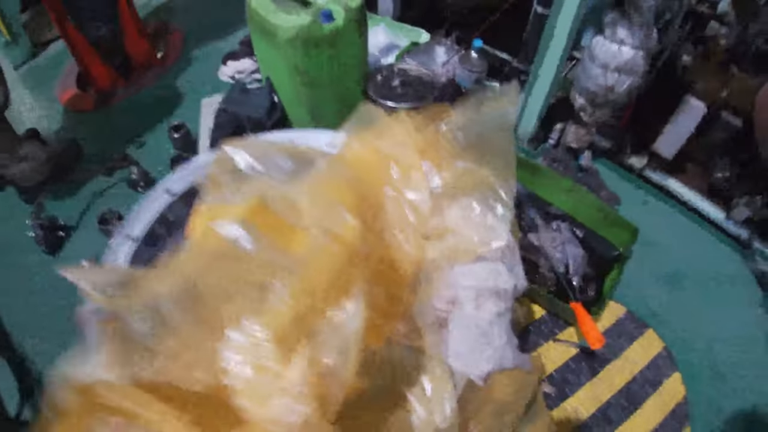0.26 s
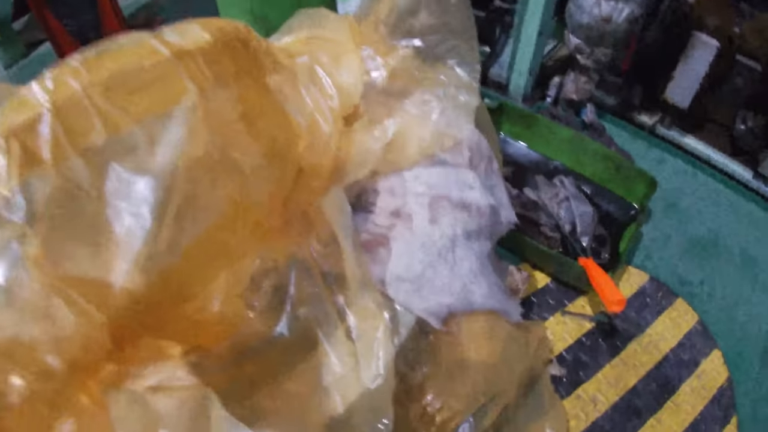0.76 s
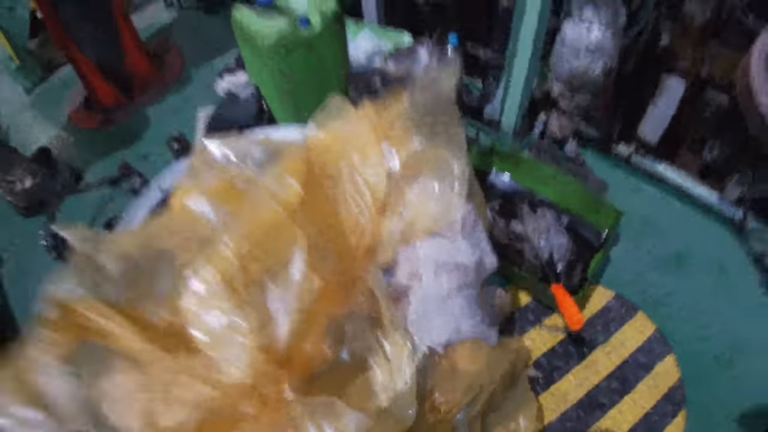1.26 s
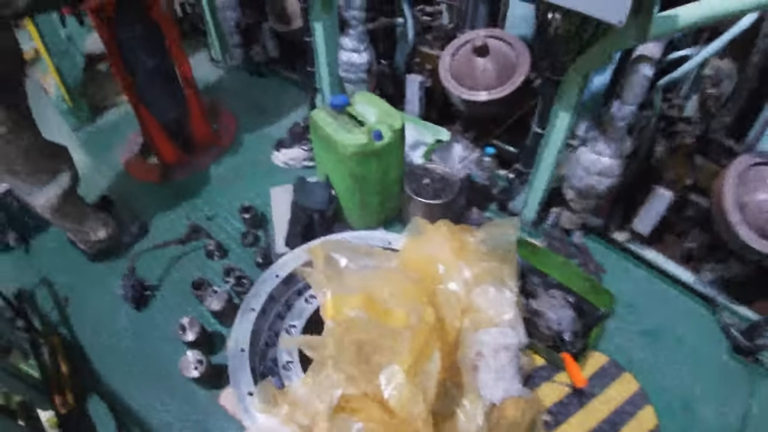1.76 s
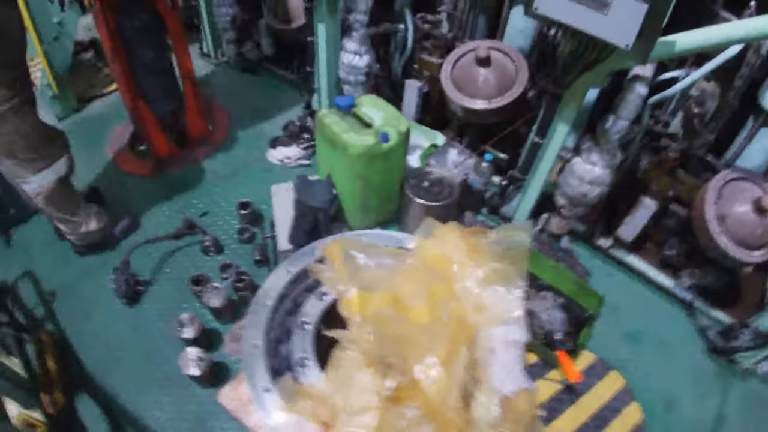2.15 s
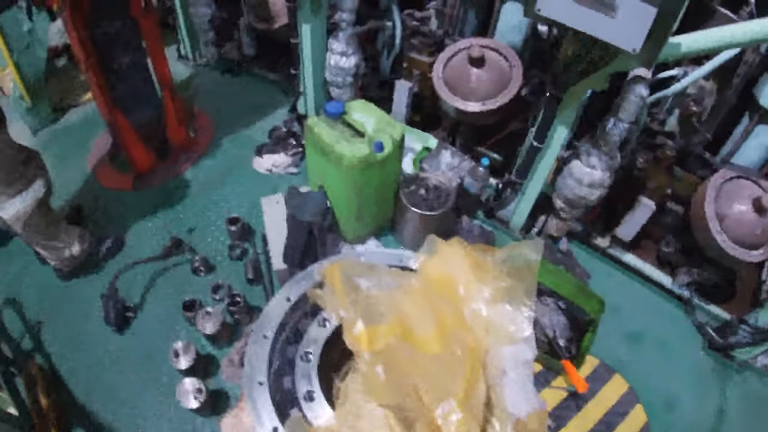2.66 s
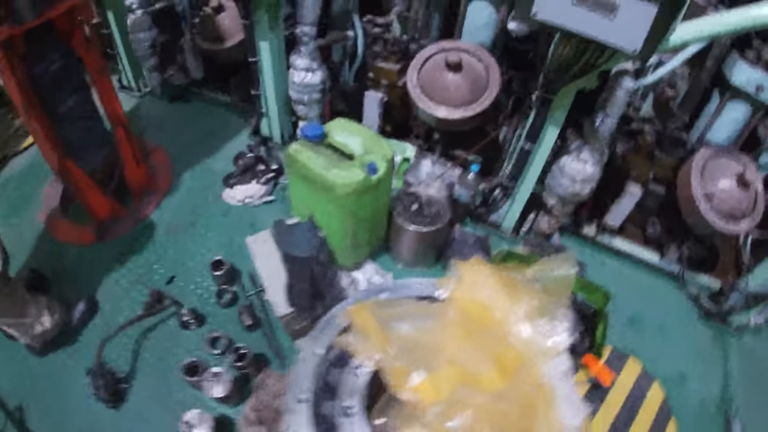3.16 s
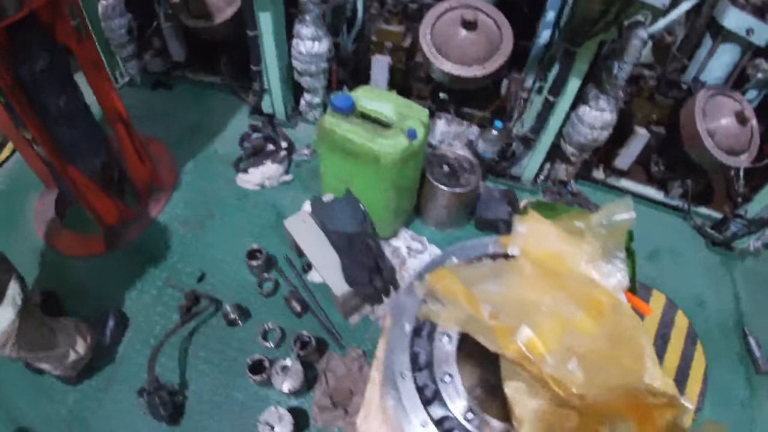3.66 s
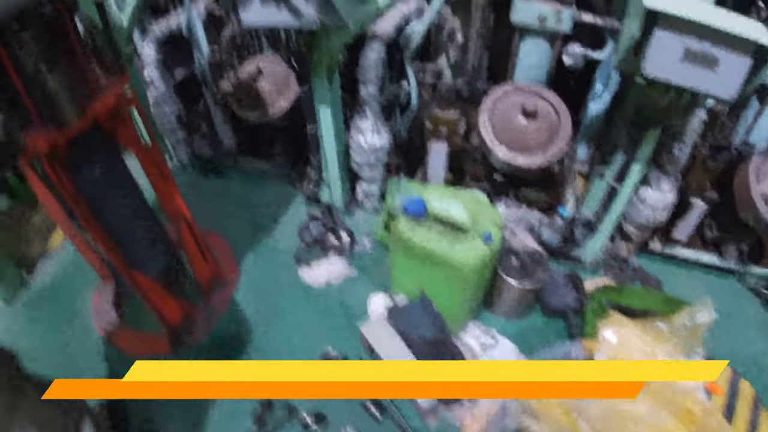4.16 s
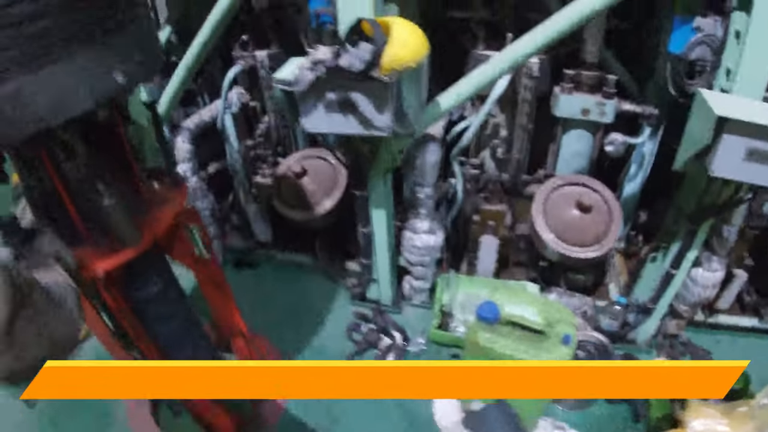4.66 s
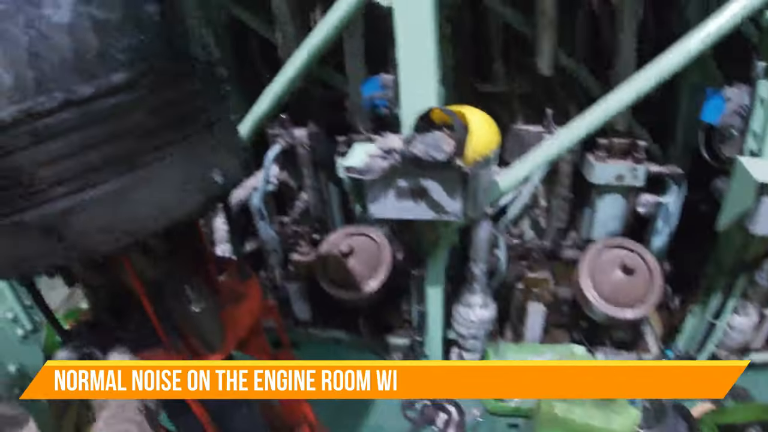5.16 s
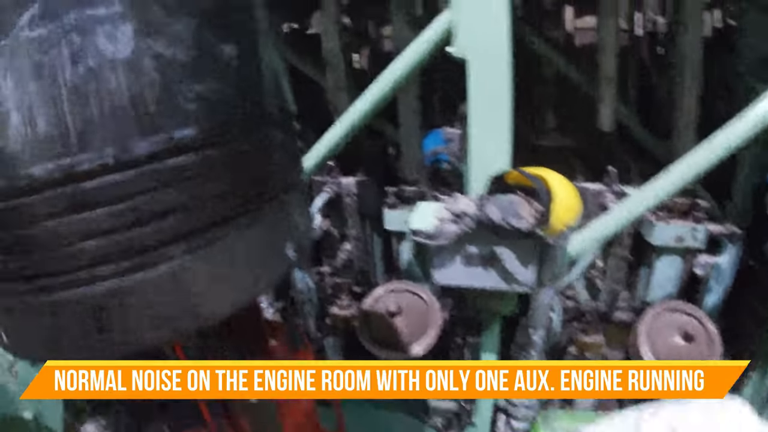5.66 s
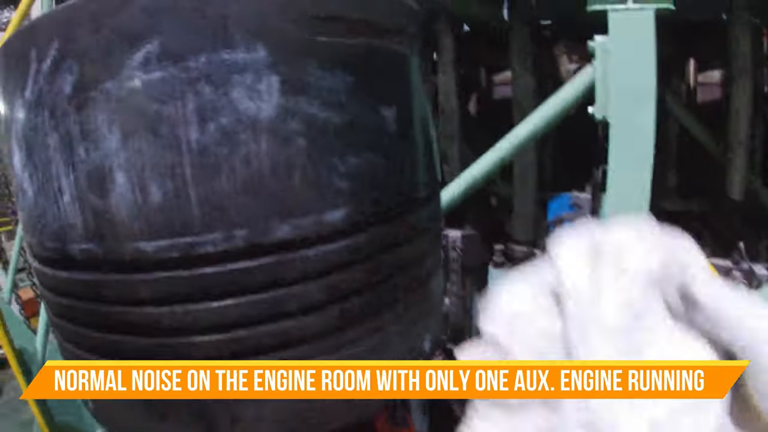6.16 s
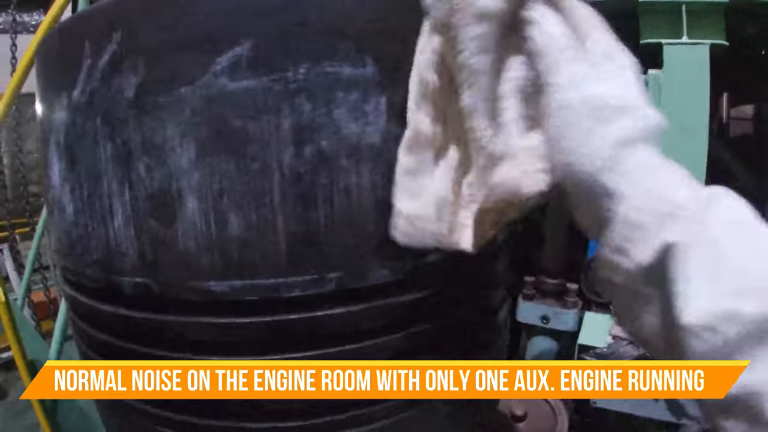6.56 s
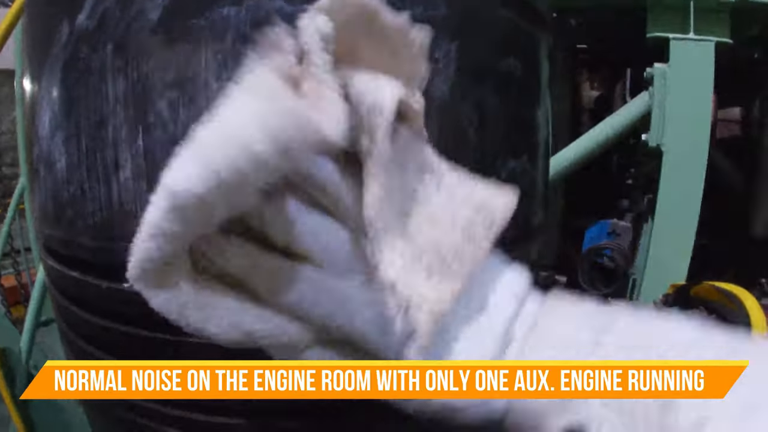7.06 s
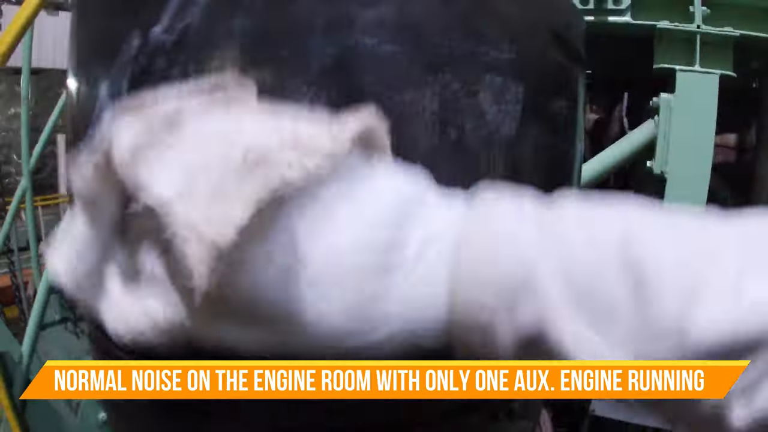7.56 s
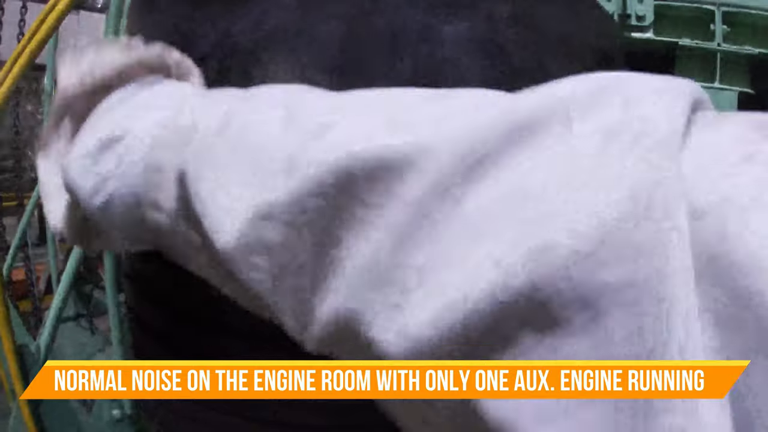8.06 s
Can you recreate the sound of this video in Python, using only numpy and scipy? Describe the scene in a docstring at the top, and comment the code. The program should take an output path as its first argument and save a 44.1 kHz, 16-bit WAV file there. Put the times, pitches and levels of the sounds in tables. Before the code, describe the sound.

A diesel generator runs at constant speed in a ship's steel engine room, giving a dense, low drone with a slight fast clatter. Ventilation roars behind it, a pump holds a few steady mid-pitched tones, and two thin high whines slowly draw together in pitch. Single tones swell and fade as the microphone is carried through the room. Near the end the clatter dulls slightly, while the drone carries on.

```python
"""Ship's engine room: a six-cylinder four-stroke diesel generator runs steadily at about 900 rpm.
Its orders drone in the steel room, swelling and fading as the microphone is carried through
standing waves. Ventilation roars behind it, a pump sings over steady hums, and the thin whines of
two fast rotors drift towards each other. Late on, a steel part screens the clatter and the
highest hiss fades briefly."""
import sys
import numpy as np
from scipy import signal
from scipy.fft import rfft, irfft
from scipy.io import wavfile
from scipy.ndimage import uniform_filter1d, minimum_filter1d, map_coordinates

SR = 44100
rng = np.random.default_rng(int(sys.argv[2]) if len(sys.argv) > 2 else 0)


def int16_out(signal):
    """Quantize to a 16-bit WAV file."""
    q = np.round(np.clip(np.atleast_2d(signal).T, -1, 1) * 32767)
    wavfile.write(sys.argv[1], SR, q.astype(np.int16))


N = 366912
TIME = np.arange(N) / SR
CYCLE_HZ = 7.479  # one cycle = two revolutions; orders are its multiples


def diesel(count=800, cycle_samples=8192, drone_diffuse=0.01):
    """The four-stroke cycle repeats; the room slowly reweights each order."""
    # leading orders: order, level at first spot/dB, level at second spot/dB
    drone = [(6, -34.5, -43.5), (9, -39, -33), (14, -38.5, -43), (21, -38.5, -41.5), (23, -37, -39.5),
             (24, -41, -40.5), (25, -37, -34), (26, -40, -35.5), (27, -41, -34.5), (28, -36.5, -42),
             (31, -35.5, -45), (32, -32.5, -36), (33, -49, -41.5), (34, -30.5, -34.5), (36, -49.5, -34.5),
             (39, -42, -39), (42, -40.5, -43.5), (48, -46, -43.5), (136, -51, -57.5)]
    # other prominent orders: order, level/dB
    prominent = [(8, -45), (10, -40), (12, -39.5), (13, -46.5), (16, -48), (17, -42.5), (18, -42),
                 (19, -42.5), (20, -46.5), (22, -47), (29, -46.5), (30, -52), (37, -43.5), (44, -44),
                 (46, -56), (47, -46.5), (50, -48.5), (51, -46.5), (54, -45.5), (65, -57.5), (67, -55),
                 (68, -46.5), (72, -50), (102, -55.5), (124, -59), (132, -56.5)]
    # all remaining orders: f/Hz, level of each/dB
    comb = [(8, -74), (40, -62.5), (80, -42.5), (150, -47), (220, -49), (300, -49), (400, -53),
            (520, -50.5), (620, -60), (760, -59), (1100, -60.5), (1400, -66), (1700, -70), (3000, -87),
            (6000, -99)]
    t = np.linspace(0, N / SR, num=200)
    hz = np.arange(count) * CYCLE_HZ
    level_db = spectrum(comb, hz)[:, None] + np.zeros(len(t))
    diffuse = spectrum([(45, 0.062), (200, 0.54), (600, 0.49), (2000, 0.81)], hz)  # f/Hz, power share
    for order, db in prominent:
        level_db[round(order)] = db
    for order, first_db, second_db in drone:
        level_db[round(order)] = walk_db(first_db, second_db, t) + standing_db("diesel", order, t)
        diffuse[round(order)] = drone_diffuse
    orders = from_db(level_db) * fading(hz, t, diffuse, walk_m_s=0.3)
    cycles = irfft(evenly_fired(orders).T, cycle_samples) * cycle_samples / np.sqrt(2)
    crank = TIME * CYCLE_HZ % 1
    return map_coordinates(cycles, [TIME / t[1], crank * cycle_samples], order=1, mode="grid-wrap")


def evenly_fired(orders, cycle_samples=256, count=42):
    """Cylinders share the load: low orders are phased so that no single thump dominates."""
    low = orders[:count]
    cycle = np.fft.ifft(low, cycle_samples, axis=0)
    flat = np.fft.fft(cycle / (abs(cycle) + 1e-12), axis=0)[:count]
    return np.vstack([abs(low) * np.exp(1j * np.angle(flat)), orders[count:]])


def clatter(depth_db=0.55, count=40):
    """Valves and injectors roughen the noise with the same gain pattern every cycle."""
    crank = np.linspace(0, 1, num=1024)
    pattern = sum(np.cos(2 * np.pi * (k * crank + rng.random())) / k ** 0.23 for k in range(2, count))
    return from_db(depth_db * np.interp(TIME * CYCLE_HZ % 1, crank, unit(pattern)))


def roar():
    """Ventilation and combustion noise rings the steel panels."""
    # noise spectrum: f/Hz, density/(dB per Hz)
    density = [(10, -69), (25, -54), (50, -55), (65, -53.5), (85, -53), (105, -52), (130, -50),
               (175, -50.5), (195, -56.5), (220, -55), (240, -49), (260, -55), (400, -60.5), (520, -64),
               (650, -65.5), (850, -71), (1100, -70), (1700, -79), (2750, -79.5), (4300, -89), (5600, -90),
               (6300, -101), (7200, -116)]
    # panel resonances: f/Hz, width/Hz, boost/dB
    panels = [(1423, 64, 5), (1753, 90, 5.5), (2430, 63, 3)]
    return turbulence(density, panels)


def pump(base_hz=350.95):
    """Harmonics of a steady pump; the three strongest pass through nodes and antinodes."""
    # strong tones: multiple, level at first spot/dB, level at second spot/dB, diffuse share/0-1
    strong = [(2, -50.5, -53.5, 0.28), (3, -52.5, -53, .3), (4, -53.5, -60, 0.05)]
    # weak tones: multiple, level/dB
    weak = [(6, -68.5), (7, -68.5), (8, -64), (9, -72), (10, -68), (11, -68), (12, -87), (14, -79.5)]
    song = np.zeros(N)
    for k, first_db, second_db, diffuse in strong:
        level_db = walk_db(first_db, second_db, TIME) + standing_db("pump", k, TIME)
        song += from_db(level_db) * tone(round(k) * base_hz, diffuse, walk_m_s=0.6)
    for k, db in weak:
        song += from_db(db) * tone(round(k) * base_hz, diffuse=0.68, walk_m_s=0.65)
    return song


def steady_tones():
    """Steady low hums, and two faint high tones beside the pump's seventh harmonic."""
    # tones: f/Hz, level/dB
    tones = [(82.5, -52), (108.5, -54.5), (169, -50.5), (238, -45), (2421, -65), (2491, -69)]
    return sum(from_db(db) * tone(hz, diffuse=0.76, walk_m_s=0.96) for hz, db in tones)


def rotors():
    """Two fast rotors converge in speed."""
    # blade tones: t/s, rising f/Hz, falling f/Hz
    pitches = [(0, 4613, 4753), (2, 4612, 4757), (2.7, 4620, 4752), (4, 4642, 4735), (5, 4652, 4721),
               (7.3, 4669, 4704), (8.32, 4680, 4682)]
    times_s, rising_hz, falling_hz = np.transpose(pitches)
    rising = whine("rising", np.interp(TIME, times_s, rising_hz))
    falling = whine("falling", np.interp(TIME, times_s, falling_hz))
    return rising + falling


def whine(name, hz, jitter_hz=2.2, third_db=-98):
    """Blade tone, octave and third harmonic: the speed trembles, all flutter in the room."""
    # per rotor: tone at first spot/dB, at second/dB, octave at first spot/dB, at second/dB
    levels = {"rising": (-69.5, -62.5, -74.5, -75.5), "falling": (-70.5, -70, -75.5, -73.5)}
    tone_db = walk_db(*levels[name][:2], TIME) + standing_db(name, 1, TIME)
    octave_db = walk_db(*levels[name][2:], TIME) + standing_db(name, 2, TIME)
    t = np.linspace(0, N / SR, num=1200)
    tremble = unit(drift(rate_hz=12, t=t)[0].real)
    hz = hz + jitter_hz * np.interp(TIME, t, tremble)
    return (from_db(tone_db) * tone(hz, diffuse=0.39, walk_m_s=1.0)
            + from_db(octave_db) * tone(2 * hz, diffuse=0.8, walk_m_s=0.45)
            + from_db(third_db) * tone(3 * hz, diffuse=0.85, walk_m_s=0.45))


def hiss():
    """Faint high noise of moving air."""
    # hiss spectrum: f/Hz, density/(dB per Hz)
    density = [(4000, -112), (7000, -108), (8000, -108), (9300, -105), (10000, -111), (10800, -120),
               (12200, -115), (14300, -119), (15300, -127)]
    return turbulence(density)


def turbulence(density, panels=()):
    """Noise of a given spectral density, lifted where panels ring."""
    hz = np.fft.rfftfreq(N, 1 / SR)
    ring_db = sum(db / (1 + (2 * (hz - mode_hz) / width_hz) ** 2) for mode_hz, width_hz, db in panels)
    rolloff = 1 / (1 + (hz / (1.15 * density[-1][0])) ** 20)
    gain = from_db(spectrum(density, hz) + ring_db) * rolloff
    return irfft(rfft(rng.standard_normal(N)) * gain, N) * np.sqrt(SR / 2)


def carried(x, boom_octaves=0.23, open_db=0.5, screen_db=-2.5, screen_start_s=6.38, screen_fade_s=0.82):
    """Bands swell where the room booms; near the second spot a big steel part screens the clatter."""
    # room lifts (+) and hollows (-) on the way: t/s, half length/s, f/Hz, gain/dB
    booms = [(0.148, .3, 376, 5.5), (.3, 1.2, 905, -1.5), (0.204, 1.1, 2880, -1.5), (.62, 0.16, 1120, 3.5),
             (1.15, 0.2, 495, 4.5), (1.3, .45, 165, 2), (1.753, 0.48, 396, 4), (2.702, 0.99, 173.5, -1),
             (2.607, 0.94, 608, 5), (3.699, 1.3, 1390, -1.5), (4.097, 0.58, 398, 4.5), (4.85, 0.3, 755, 3),
             (5.298, 1.3, 2960, 2), (5.544, 0.28, 510, 4.5), (5.7, .4, 295, -4.5), (5.805, 0.92, 373, 5.5),
             (6.303, 0.75, 125, 5), (6.6, 0.53, 191, 2), (6.696, 0.44, 760, 3), (6.897, 0.8, 623, -4),
             (7.304, 1.1, 293, 4), (8.05, 0.32, 545, 2.5), (8.1, 0.74, 1460, 2)]
    hz, t, bins = signal.stft(x, SR, nperseg=2048)
    boom_db = -1.5 * band(hz, centre_hz=426, octaves=2 * boom_octaves)  # constant hollow under the booms
    for at_s, half_s, centre_hz, db in booms:
        boom_db = boom_db + db * bell(t, at_s, half_s) * band(hz, centre_hz, boom_octaves)
    screened = np.clip((t - screen_start_s) / screen_fade_s, 0, 1)
    clatter_db = (open_db + screen_db * screened) * band(hz, centre_hz=2200, octaves=1)
    return signal.istft(bins * from_db(boom_db + clatter_db), SR, nperseg=2048)[1][:N]


def top_treble_dip(x, at_s=7.95, half_s=0.75, depth_db=-4.5):
    """The highest hiss fades briefly near the end."""
    hz, t, bins = signal.stft(x, SR, nperseg=512)
    dip_db = depth_db * bell(t, at_s, half_s) * band(hz, centre_hz=13000, octaves=0.45)
    return signal.istft(bins * from_db(dip_db), SR, nperseg=512)[1][:N]


def walk_db(first_db, second_db, t, start_s=2.33, end_s=8.4):
    """Level glide as the microphone moves from the first spot to the second."""
    return np.interp(t, [start_s, end_s], [first_db, second_db])


def standing_db(source, multiple, t):
    """Gain of one tone along the path through its standing waves."""
    # antinodes (+) and nodes (-): t/s, source, multiple, half length/s, gain/dB
    waves = [(0, "diesel", 24, .8, 5.5), (3.5, "diesel", 6, 1.2, 1.5), (5, "diesel", 9, 1, 1),
             (.8, "diesel", 23, .9, 4.5), (1, "diesel", 25, .3, -12), (1, "diesel", 26, .6, -9.5),
             (0.997, "diesel", 28, .5, -8), (3.05, "diesel", 36, .6, 12), (2.299, "diesel", 31, .8, 1),
             (3.15, "diesel", 32, 0.16, -7), (3.45, "diesel", 34, 0.37, -6), (4.4, "diesel", 32, 0.56, 1.5),
             (5.198, "diesel", 25, .68, 5), (5.298, "diesel", 39, .55, -12), (5.6, "diesel", 48, .8, 4),
             (5.899, "diesel", 34, 1, -10.5), (5.8, "diesel", 32, .45, -8.5), (6.9, "diesel", 32, .3, -8.5),
             (6.7, "diesel", 25, .38, -1), (7.603, "diesel", 26, .3, 4.5), (8.25, "diesel", 26, .27, -17),
             (0.676, "diesel", 136, .18, 6), (2.417, "diesel", 136, .3, 8.5), (3.25, "diesel", 136, .15, 6),
             (3.85, "diesel", 136, .15, 5.5), (7.698, "diesel", 136, .4, -9.5),
             (2.15, "pump", 2, 0.62, 11.5), (3.218, "pump", 2, .18, 12.5), (3.703, "pump", 2, .2, -3),
             (4.3, "pump", 2, .15, 5), (4.98, "pump", 2, .15, 5.5), (2, "pump", 3, .15, 10),
             (6.1, "pump", 3, .35, 5), (7.1, "pump", 3, .35, 5), (.75, "pump", 4, .15, 5),
             (1.12, "pump", 4, .09, 8.5), (1.432, "pump", 4, .08, 7.5), (1.85, "pump", 4, .1, -10),
             (2.352, "pump", 4, .28, 6.5), (2.97, "pump", 4, .13, -13), (4.72, "pump", 4, .17, 5),
             (7.9, "pump", 4, .6, 9), (1.2, "rising", 1, .33, -6), (1.65, "rising", 1, .12, 7.5),
             (4.3, "rising", 1, .6, 4), (5.3, "rising", 1, .2, 3), (5.85, "rising", 1, .22, 5.5),
             (6.8, "rising", 1, 0.19, -5), (7.6, "rising", 1, .2, 1.5), (7.92, "rising", 1, .07, -13),
             (6.12, "falling", 1, .14, 7), (7.5, "falling", 1, .15, -3), (7.9, "falling", 1, .08, -7),
             (2.28, "rising", 2, .05, 8), (2.46, "rising", 2, .16, -14), (2.78, "rising", 2, .09, 6),
             (4.45, "rising", 2, .06, 4), (6.4, "rising", 2, .08, -9), (6.74, "rising", 2, .06, 10),
             (7.03, "rising", 2, .07, -8), (7.628, "rising", 2, .05, 8.5), (8.22, "rising", 2, .17, 6),
             (1.09, "falling", 2, .05, 9), (2.404, "falling", 2, .12, -10), (5.53, "falling", 2, .06, 5),
             (6.41, "falling", 2, .05, 8), (6.568, "falling", 2, .05, 9), (7, "falling", 2, .09, -10),
             (7.25, "falling", 2, .16, 10.5), (7.44, "falling", 2, .06, -16)]
    return sum(db * bell(t, at_s, half_s) for at_s, name, k, half_s, db in waves
               if name == source and round(k) == round(multiple))


def tone(hz, diffuse, walk_m_s):
    """One tone through the room, rms 1."""
    t = np.linspace(0, N / SR, num=1200)
    gain = np.interp(TIME, t, fading(np.mean(hz), t, diffuse, walk_m_s)[0])
    phase = 2 * np.pi * np.cumsum(hz * np.ones(N)) / SR
    return unit((gain * np.exp(1j * phase)).real)


def fading(hz, t, diffuse, walk_m_s, still_hz=0.28, sound_m_s=343):
    """Complex gain of direct sound plus echoes; short waves fade faster for a moving microphone."""
    share = np.clip(np.reshape(diffuse, (-1, 1)), 0, 1)
    echoes = drift(still_hz + walk_m_s * np.asarray(hz) / sound_m_s, t)
    direct = np.exp(2j * np.pi * rng.random((len(echoes), 1)))
    return unit(np.sqrt(1 - share) * direct + np.sqrt(share) * echoes)


def drift(rate_hz, t):
    """Slow complex noise, rms 1, one row per rate."""
    rate_hz = np.reshape(rate_hz, (-1, 1))
    real, imag = rng.standard_normal((2, len(rate_hz), 2 * len(t)))
    hz = np.fft.fftfreq(2 * len(t), t[1] - t[0])
    return unit(np.fft.ifft((real + 1j * imag) * bell(hz, 0, rate_hz))[:, :len(t)])


def spectrum(points, hz):
    """Table interpolated over log frequency."""
    points_hz, values = np.transpose(points)
    return np.interp(np.log(hz + 1), np.log(points_hz + 1), values)


def band(hz, centre_hz, octaves):
    """Bell over log frequency, as a column."""
    return bell(np.log2(hz[:, None] + 1), np.log2(centre_hz), octaves)


def bell(x, centre, half_width):
    """Gaussian of height 1."""
    return np.exp(-((x - centre) / half_width) ** 2)


def from_db(db):
    """Decibels to gain."""
    return 10 ** (np.asarray(db) / 20)


def unit(x):
    """Rms 1 along the last axis."""
    return x / np.sqrt(np.mean(abs(x) ** 2, -1, keepdims=True) + 1e-20)


def scene():
    """All machines at one microphone."""
    engine = carried(diesel() + roar() * clatter())
    return (engine + rotors() + top_treble_dip(hiss()) + pump() + steady_tones())[None]


def record(dry, ceiling_db=-12.2, hold_s=0.042, cutoff_hz=15400):
    """Fast peak limiter, then low-pass."""
    hold_samples = round(hold_s * SR)
    gain = np.minimum(1, from_db(ceiling_db) / (abs(dry) + 1e-9))
    gain = uniform_filter1d(minimum_filter1d(gain, hold_samples), hold_samples)
    lowpass = signal.firwin(511, cutoff_hz, window=("kaiser", 9), fs=SR)
    return signal.oaconvolve(dry * gain, lowpass[None], "same")


dry = scene()
out = record(dry)
int16_out(out)
```